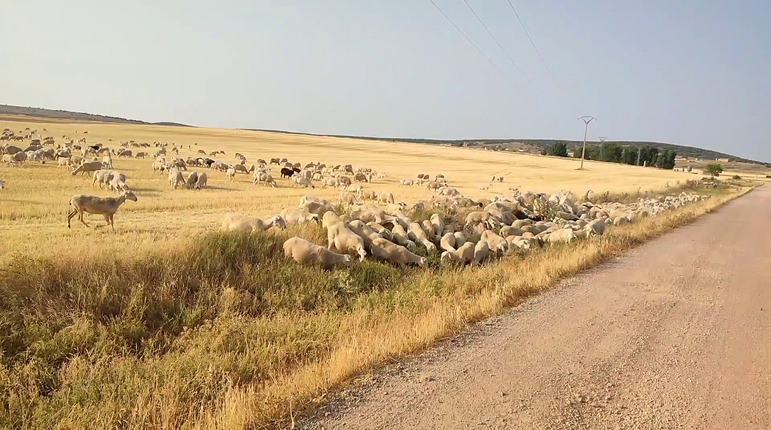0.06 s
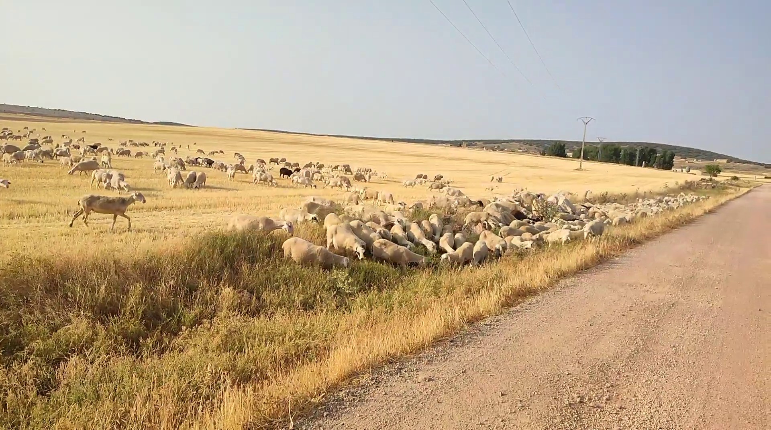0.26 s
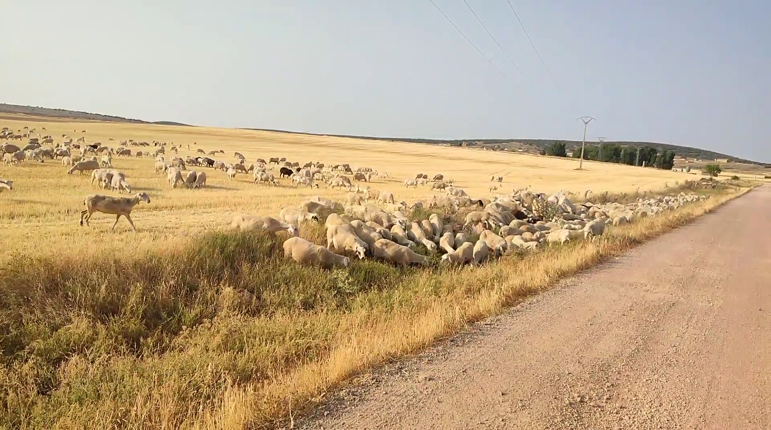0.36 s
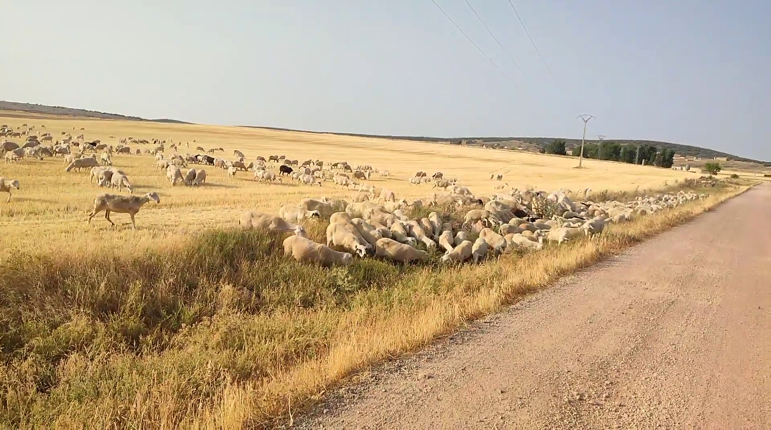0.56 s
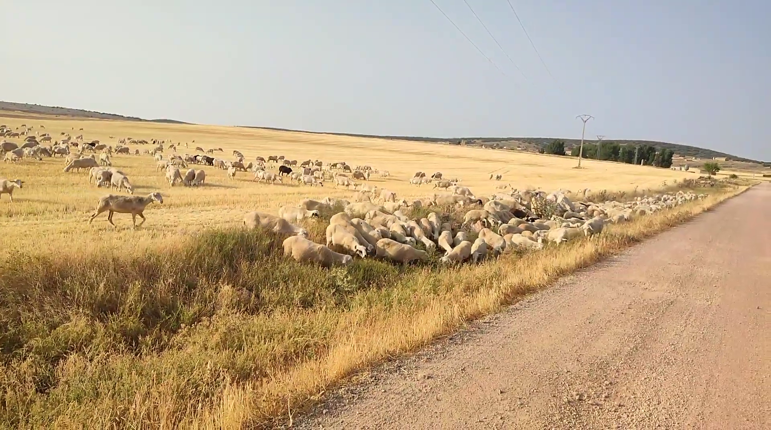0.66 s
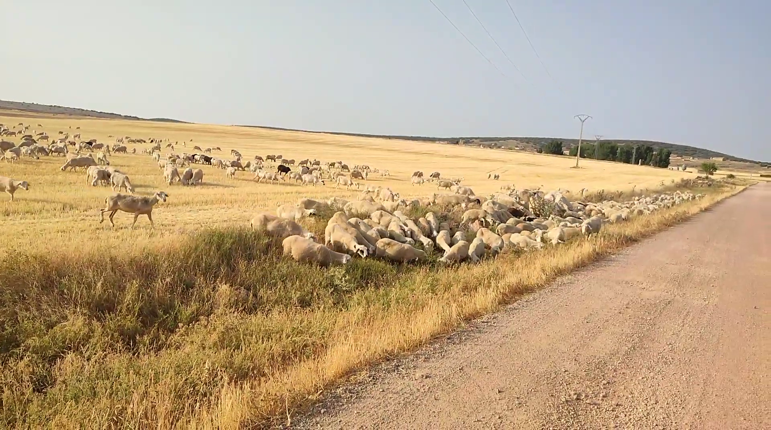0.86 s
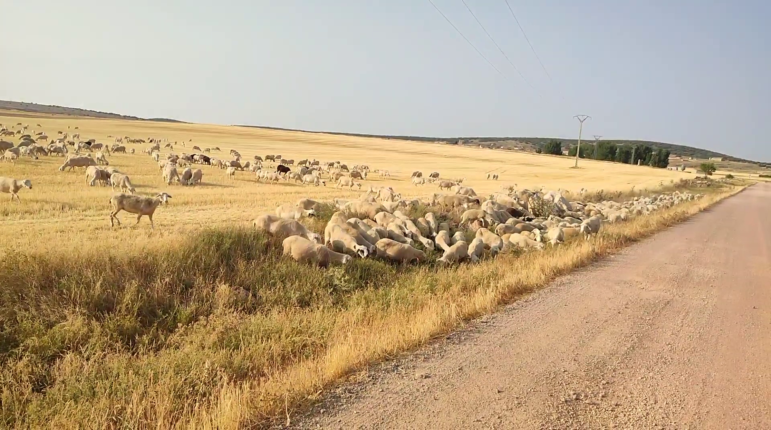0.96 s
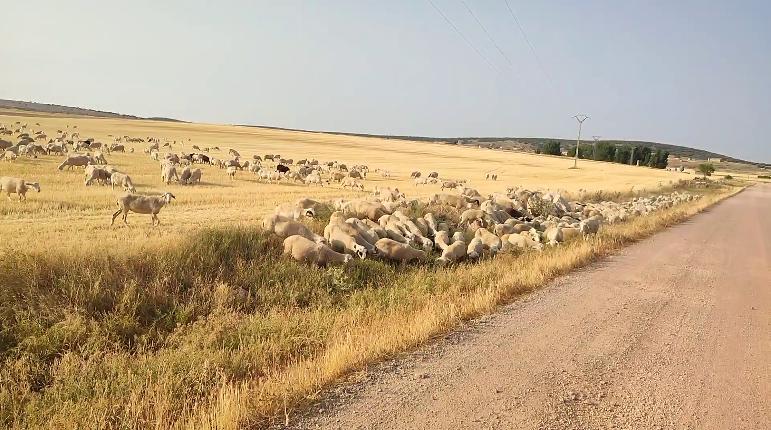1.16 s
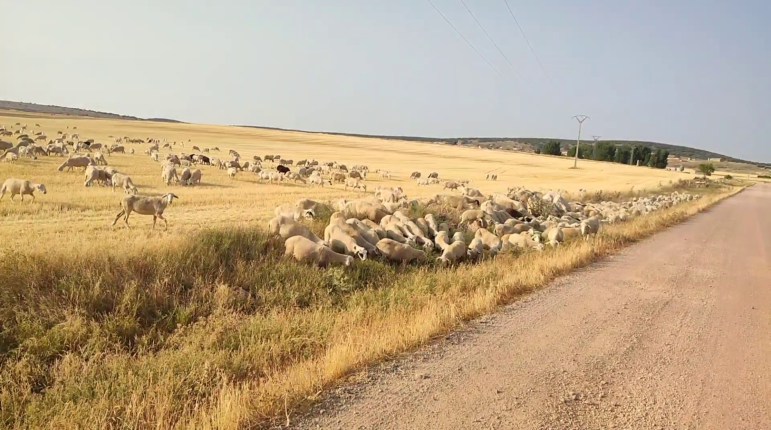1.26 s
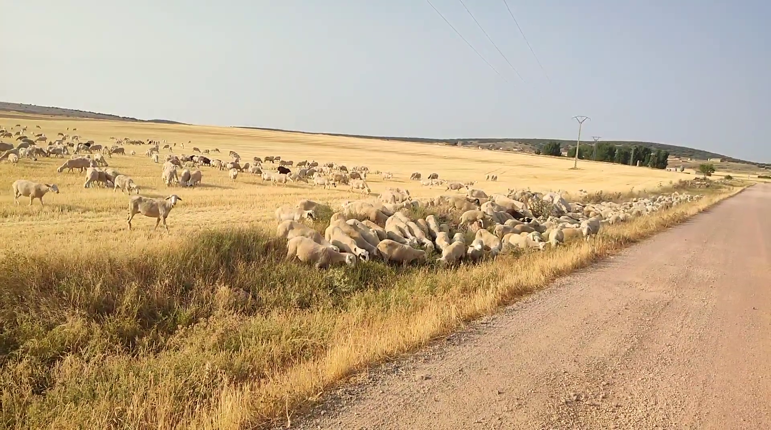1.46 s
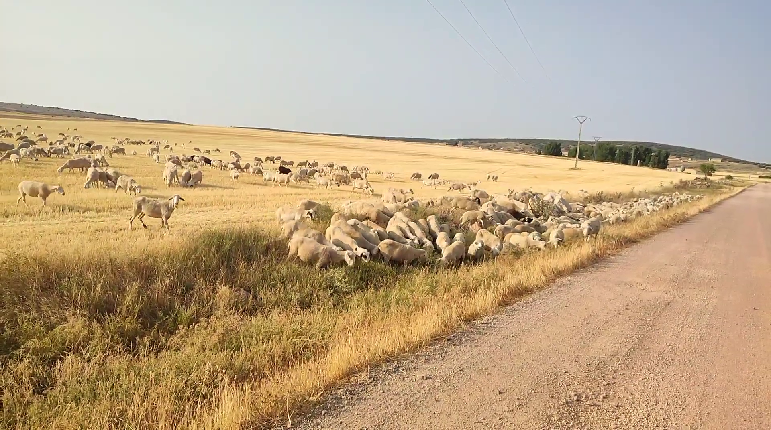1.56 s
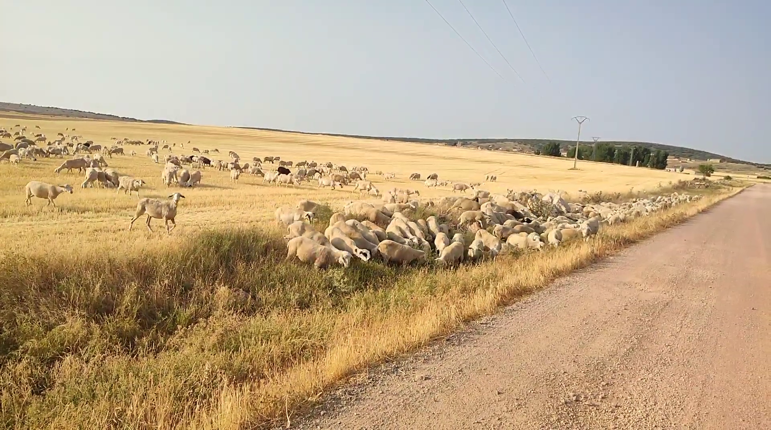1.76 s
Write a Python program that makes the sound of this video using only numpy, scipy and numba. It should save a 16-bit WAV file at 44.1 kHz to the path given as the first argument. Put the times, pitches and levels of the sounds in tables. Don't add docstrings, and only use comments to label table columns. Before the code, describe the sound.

One short creaky sheep bleat, followed by clattering livestock bells over a soft, rustling outdoor hush.

```python
import sys
import numpy as np
from scipy import signal
from scipy.fft import rfft, irfft
from scipy.io import wavfile
from scipy.ndimage import uniform_filter1d
from numba import njit

SR = 44100
rng = np.random.default_rng(int(sys.argv[2]) if len(sys.argv) > 2 else 0)


def wav_out(sig):
    wavfile.write(sys.argv[1], SR, np.round(np.clip(np.atleast_2d(sig).T, -1, 1) * 32767).astype(np.int16))


def magnitude_from_level(level_db):
    exponent = np.asarray(level_db, float) / 20
    return 10 ** exponent


N = 79380

# start in seconds, length in seconds.
MUFFLED = [
    (0.228, 0.03),
    (1.122, 0.0067),
    (1.215, .012),
    (1.323, 0.0048),
    (1.523, 0.032),
    (1.641, .05),
]
BELL_RISE_S = 0.002


@njit
def svf(x, hz, width):
    y, b, l = np.empty(len(x)), 0., 0.
    for i in range(len(x)):
        g, k = np.tan(np.pi * hz[i] / SR), width / hz[i]
        v = (b + g * (x[i] - l)) / (1 + g * (g + k))
        b, l, y[i] = 2 * v - b, l + 2 * g * v, k * v
    return y


@njit
def ring(x, turn, fade):
    y, z = np.empty(len(x)), 0j
    for i in range(len(x)):
        z = z * turn * fade[i] + x[i]
        y[i] = z.imag
    return y


def band(x, hz, width):
    return svf(x + 1e-18, np.full(N, float(hz)), float(width))


def curve(table, hz):
    table = np.array(table)
    return magnitude_from_level(np.interp(np.log(hz + 1), np.log(table[:, 0]), table[:, 1]))


def walk(rate):
    k = int(SR / rate)
    steps = np.repeat(rng.standard_normal(N // k + 1), k)
    return 1.66 * uniform_filter1d(uniform_filter1d(steps, k), k)[:N]


def spikes(times, sizes):
    at, out = np.asarray(times) * SR, np.zeros(N + 9)
    near = np.floor(at)[:, None] + np.arange(-7, 9)
    away = near - at[:, None]
    shape = np.sinc(away) * np.cos(away * np.pi / 16) ** 2
    np.add.at(out, np.clip(near, 0, N).astype(int), np.asarray(sizes)[:, None] * shape)
    return out[:N]


def ports(x, lead_s, shadow):
    hz = np.arange(N // 2 + 1) * SR / N
    left = irfft(rfft(x) * curve(shadow, hz) * np.exp(2j * np.pi * hz * lead_s), N)
    return np.array([left, x])


def hush(t):
    # frequency in Hz, level in dB per Hz.
    hush_left = [(40, -85), (170, -91.5), (600, -101), (1500, -104), (5500, -103), (8300, -99),
                 (10000, -110), (12500, -104)]
    hush_right = [(40, -85), (170, -91), (600, -101), (1200, -102), (3800, -92), (7000, -100), (8600, -122),
                  (12500, -103)]
    # time in seconds, level in dB.
    rustle = [
        (0, -2),
        (.5, 0),
        (.85, 2.5),
        (1.1, -0.5),
        (1.3, 2),
        (1.5, 1.5),
        (1.8, 1),
    ]
    shared_hz, straw_per_s, straw_db = 734, 280, 14.5 + 0.5
    spread_db, top_db, gust_db = 3, 9, 0.9

    count = int(straw_per_s * N / SR)
    swell, out = np.interp(t, *np.array(rustle).T), np.zeros((2, N))
    gust = walk(20)
    common = rng.standard_normal(N)
    grid = np.arange(N // 2 + 1) * SR / N
    share = 1 / (1 + (grid / shared_hz) ** 2) * np.clip(grid / 120, 0, 1)
    for port, table in enumerate((hush_left, hush_right)):
        crackle_db = np.minimum(spread_db * rng.exponential(size=count), top_db)
        crackle = rng.choice([-1, 1], count) * magnitude_from_level(crackle_db)
        straw = spikes(rng.random(count) * N / SR, crackle) * magnitude_from_level(straw_db + .5 * swell)
        own = rfft(rng.standard_normal(N) + straw)
        mixed = np.sqrt(share) * rfft(common) + np.sqrt(1 - share) * own
        whole = mixed * curve(table, grid) * np.sqrt(SR / 2)
        for hz in 30 * 2 ** np.arange(0, 9.6, .5):
            part = np.cos(np.pi * np.clip(np.log2((grid + 1) / hz), -.5, .5)) ** 2
            drift_db = 1.02 * swell * min(hz / 6000, 1) + 1.83 * walk(9.16) + gust_db * gust * (hz > 3000)
            out[port] += irfft(whole * part, N) * magnitude_from_level(drift_db)
    return out


def ticks():
    # time in seconds, peak in dB, centre in Hz, width in Hz.
    knocks = [(.018, -40, 2200, 500), (.027, -30.5, 900, 1510), (.028, -34.5, 5360, 2490),
              (.148, -42.5, 1100, 904), (.705, -45.5, 10980, 7000), (.98, -40, 897, 900),
              (1.108, -46, 1050, 383), (1.264, -42.5, 200, 300), (.958, -36, 2213, 1500),
              (.96, -47, 800, 250), (.795, -52, 720, 60), (1.085, -40, 1500, 2500),
              (1.284, -29, 1800, 3060), (1.285, -37, 11000, 5000), (1.379, -31, 2000, 3000),
              (1.38, -42, 6000, 5000), (1.733, -42, 3800, 1500), (.6, -56.5, 10100, 6000),
              (1.0, -57, 8600, 1500), (1.09, -57, 7000, 3000), (1.229, -42, 7000, 3500),
              (1.51, -58, 11500, 4000), (1.6, -53, 11000, 5000), (1.775, -46, 8200, 1980),
              (.854, -54, 301.6, 150), (1.652, -61.5, 3800, 890)]
    out = np.zeros(N)
    for s, db, hz, width in knocks:
        click = spikes([s], [magnitude_from_level(db) * SR / width / 3])
        out += band(band(click, hz, width), hz, width)
    return out


def bell(t, modes, strikes, rise_s, muffled=()):
    fleece_t60_s, clapper_keep, clank_db = 0.1, 0.6, -1
    strikes = np.array(strikes)
    at = (strikes[:, 0] * SR).astype(int)
    fleece = sum((1. * (t > s) * (t < s + d) for s, d in muffled), 0 * t) / fleece_t60_s
    out = 0
    for hz, db, t60, group in modes:
        force = strikes[:, 1 + int(round(group))]
        turn = np.exp(2j * np.pi * hz / SR)
        blows = np.zeros(N)
        blows[at] = magnitude_from_level(db + force) * (force > -90)
        slow = np.exp(-1 / (SR * (0.00054 + rise_s * (700 / hz) ** 4)))
        push = signal.lfilter([1 - slow], [1, -slow * turn], blows + 1e-18)
        fade = np.exp(-np.log(1000) / SR * (1 / t60 + fleece))
        fade = fade * np.where(blows > 0, clapper_keep, 1)
        out = out + ring(push, turn, fade)
    hits = spikes(strikes[:, 0], magnitude_from_level(strikes[:, 1:].max(axis=1) + clank_db))
    clank = signal.lfilter([1], [1, -np.exp(-1 / (0.0055 * SR))], hits)
    return out + band(clank * rng.standard_normal(N), 2700, 3940)



def big_bell(t):
    tones = [(426, 4.5, 1.27, 0), (437, -5, 0.69, 0), (1157, -5, 0.57, 0)]
    strikes = [
        (.628, -59.5),
        (1.07, -65),
        (1.382, -61),
        (1.51, -59),
        (1.67, -62),
    ]
    return bell(t, tones, strikes, 0.0021)


def small_bell(t):
    tones = [(3740, 7, 0.38, 0), (4596, -1, 0.18, 0), (3527, -23, .2, 0), (3878, -19, .2, 0)]
    strikes = [(1.732, -53.5)]
    return bell(t, tones, strikes, BELL_RISE_S)


def left_bell(t):
    tones = [(701, -0.5, 2.5, 0), (5180, 15, 0.28, 0), (5245, 7.5, 0.45, 0), (3420, 0, 0.41, 0),
             (3880, 1, .4, 0), (6767, -8, 0.18, 0)]
    strikes = [(.092, -61)]
    return bell(t, tones, strikes, BELL_RISE_S, MUFFLED)


def neighbour_bell(t):
    tones = [(713, 7, 1.55, 0), (1843, 0, 1.2, 0), (4660, 2, 0.14, 0), (7715, -6.5, 0.11, 0)]
    strikes = [(.958, -50), (1.545, -61)]
    return bell(t, tones, strikes, 0.066, MUFFLED)


def main_bell(t):
    tones = [(715, 2.5, 2.1, 0.5), (1832, 0.5, 4.5, 0), (1860, 1.5, .12, 0.5), (3339, 3, 0.35, 1),
             (3366, -8, 0.25, 2), (2940, -8.5, 0.12, 3), (3673, 2.5, .45, 2), (3760, -10.5, 0.41, 2),
             (4760, -3.5, 0.61, 3), (5090, -2.5, 0.2, 3), (5250, 0, 0.38, 3), (5345, 5, 0.13, 3),
             (7200, -13, 0.22, 3), (7800, -13.5, 0.11, 3)]
    strikes = [(.958, -99, -40, -47, -47), (1.012, -99, -53, -51, -57), (1.051, -99, -59, -99, -99),
               (1.085, -99, -59, -56, -56), (1.108, -99, -55, -65, -52), (1.284, -53.5, -58, -53, -45),
               (1.301, -99, -47.5, -56, -53.5), (1.355, -99, -99, -47, -53),
               (1.379, -41, -47.5, -50, -42.5), (1.398, -99, -42.5, -57.5, -44),
               (1.445, -99, -50, -50, -99), (1.478, -99, -50.5, -42.5, -52.5), (1.61, -64.5, -99, -99, -99),
               (1.733, -69, -99, -99, -99)]
    return bell(t, tones, strikes, BELL_RISE_S, MUFFLED)


def sheep(t):
    # time in seconds, pitch in Hz, level in dB, upper mouth resonance in Hz.
    bleat = [
        (.18, 95.5, -61, 2780),
        (.212, 101.6, -55, 2900),
        (.3, 142.3, -47, 2780),
        (0.359, 157.8, -40, 2640),
        (.44, 167.6, -41.5, 2630),
        (.635, 173.4, -41.5, 2650),
        (.772, 168.5, -42.5, 2750),
        (.862, 155.1, -45, 2960),
        (0.919, 112, -65, 3170),
    ]
    # frequency in Hz, width in Hz, level in dB, share that follows the mouth (0-1).
    throat = [(160, 130, -19, 0), (500, 143, -18.5, 0), (1100, 380, -11.5, 0), (1554, 117, 3, 0.08),
              (2315, 292, -1, 0.4), (2698, 280, 4, 1.1), (3059, 350, -0.5, 0.84), (3800, 226, -3.5, 0.1),
              (4260, 320, -6.5, 0.1), (4710, 300, -18.5, 0.3), (5100, 590, -16.5, 0.2)]
    # time in seconds, pitch change in Hz, level change in dB, width in seconds.
    catches = [
        (.253, 0, -6, 0.0041),
        (0.391, -3, -3, 0.015),
        (.422, -1, -2.5, 0.011),
        (0.498, -5.5, -1.5, .022),
        (.53, -3, -2, 0.017),
        (.562, -2.5, -1, .012),
        (.68, -2, 0, 0.015),
        (0.716, -7, -1, 0.01136),
        (0.789, -17, 0.5, .011),
        (.823, -11, 1, 0.014),
    ]
    jitter, shimmer_db, breath_db = 0.0025, 0.5, -21
    mouth_rest_hz, bleat_db = 2696, 2.5
    upper_hz, upper_lag_s, brightest_s, fade_db_per_s = 3500, 0.0007, 0.49, 12
    ground_s, ground_db = 0.002115, -12.5

    s, pitch, db, mouth = np.array(bleat).T
    catch = np.array(catches)
    slack = np.exp(-((t - catch[:, :1]) / catch[:, 3:]) ** 2)
    hz = np.interp(t, s, pitch) + catch[:, 1] @ slack
    phase = np.cumsum(hz) / SR
    k = np.arange(1, int(phase[-1]))
    chance = rng.standard_normal((2, len(k)))
    at = np.interp(k + jitter * chance[0], phase, t)
    pulses = spikes(at, magnitude_from_level(shimmer_db * chance[1])) * np.sqrt(SR / 165)
    puff = 2 * np.exp(-(phase % 1) / 0.65)
    source = pulses + magnitude_from_level(breath_db) * puff * rng.standard_normal(N)
    level = np.interp(t, s, db, -120, -120) + catch[:, 2] @ slack
    source = source * magnitude_from_level(level + bleat_db + 13.5)

    shift = np.interp(t, s, mouth) / mouth_rest_hz - 1
    out = np.zeros(N)
    for i, (f, width, gain_db, follow) in enumerate(throat):
        upper = f > upper_hz
        centre = f * (1 + follow * shift)
        late = np.roll(source, int(upper_lag_s * SR) * upper) + 1e-18
        rung = svf(svf(late, centre, 1.59 * width), centre, 1.59 * width)
        fade_db = fade_db_per_s * np.abs(t - brightest_s) * upper
        out += (-1) ** i * magnitude_from_level(gain_db - fade_db) * rung
    return out + magnitude_from_level(ground_db) * np.roll(out, int(ground_s * SR))


def scene():
    # frequency in Hz, level in dB.
    voice_shadow = [(400, -1), (520, -14), (750, 12.5), (1300, -17.5), (1850, 0.5), (2300, -10.5),
                    (4500, -15), (8000, 1.5)]
    bell_shadow = [(430, -3), (715, 0), (1840, -9.5), (3400, -15), (5300, -12.5), (7700, 7)]
    t = np.arange(N) / SR
    bells = main_bell(t) + neighbour_bell(t) + big_bell(t) + small_bell(t)
    voice_side = ports(sheep(t) + left_bell(t), 0.00038, voice_shadow)
    bell_side = ports(bells + ticks(), 0.0004666, bell_shadow)
    return voice_side + bell_side + hush(t)


def top_cut(x):
    return signal.sosfilt(signal.butter(12, 14760, fs=SR, output="sos"), x)


def record(dry):
    top_hz = 14250
    cut = signal.sosfilt(signal.ellip(10, .2, 60, top_hz, fs=SR, output="sos"), dry)
    return top_cut(cut)


dry = scene()
out = record(dry)
wav_out(out)
```